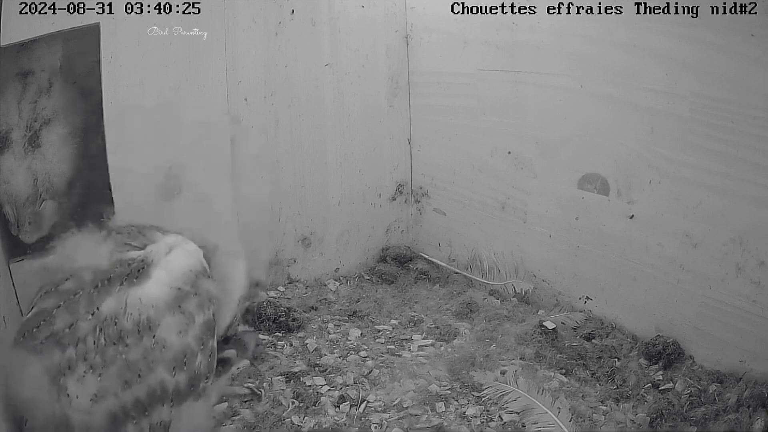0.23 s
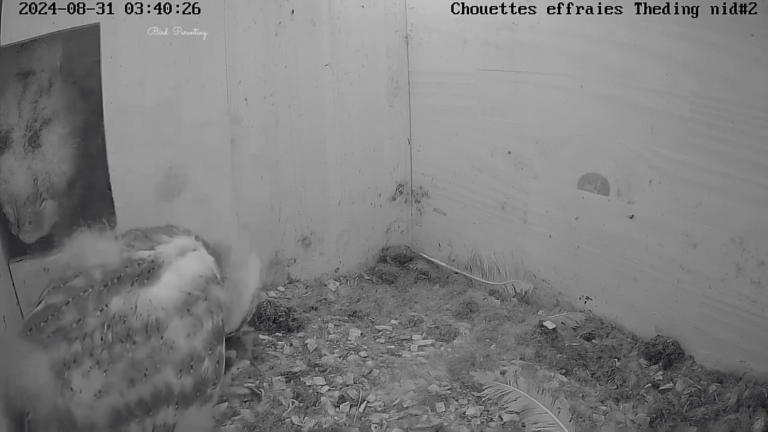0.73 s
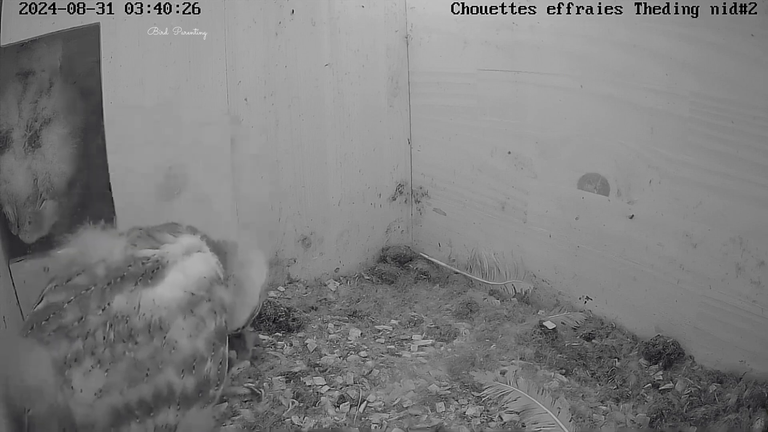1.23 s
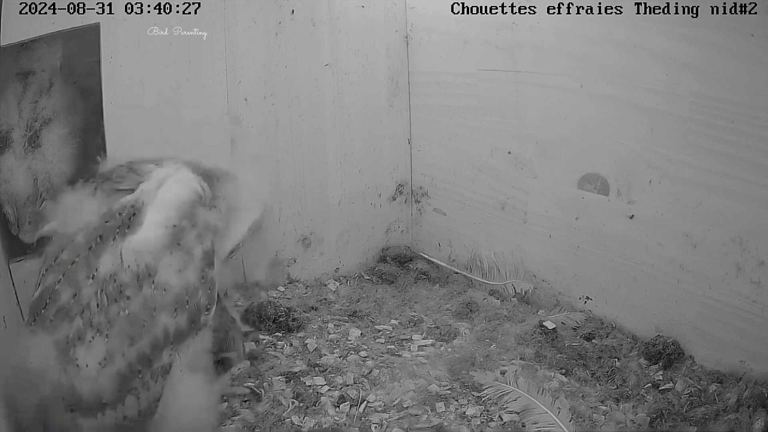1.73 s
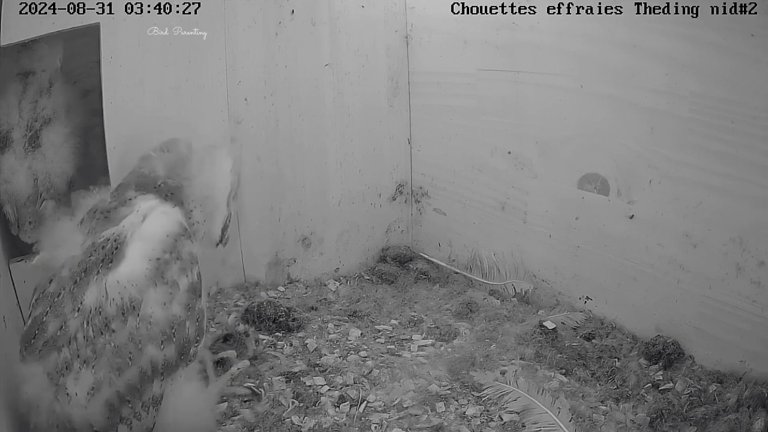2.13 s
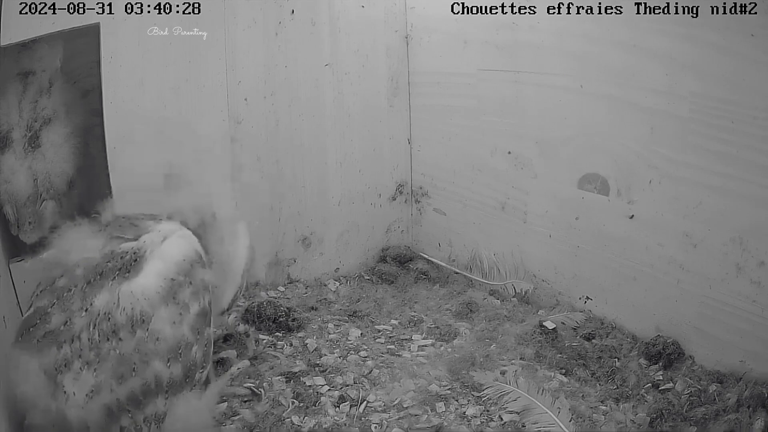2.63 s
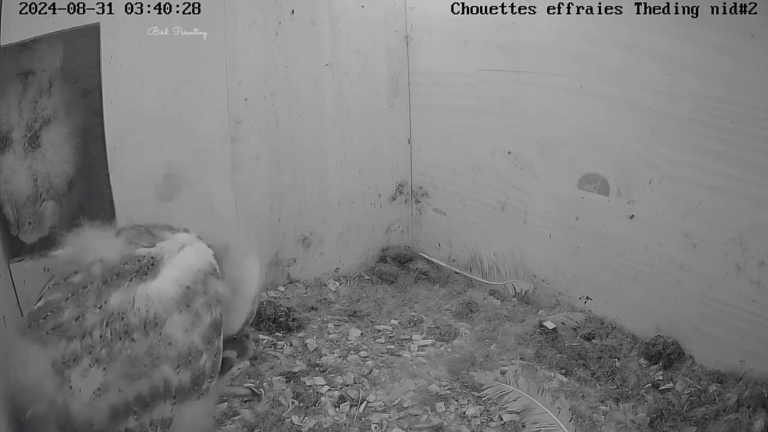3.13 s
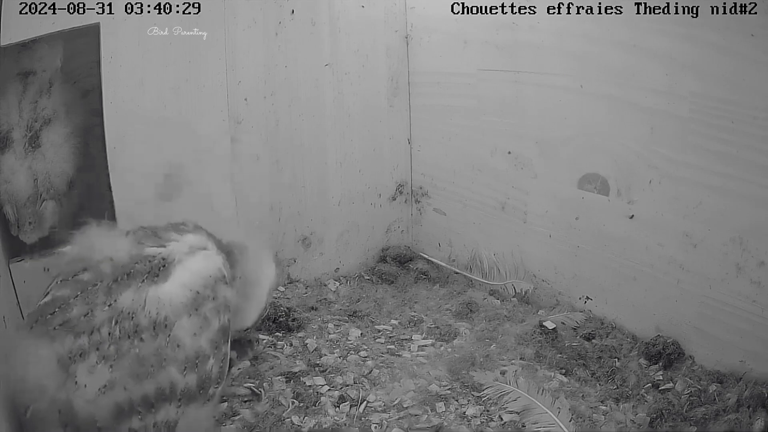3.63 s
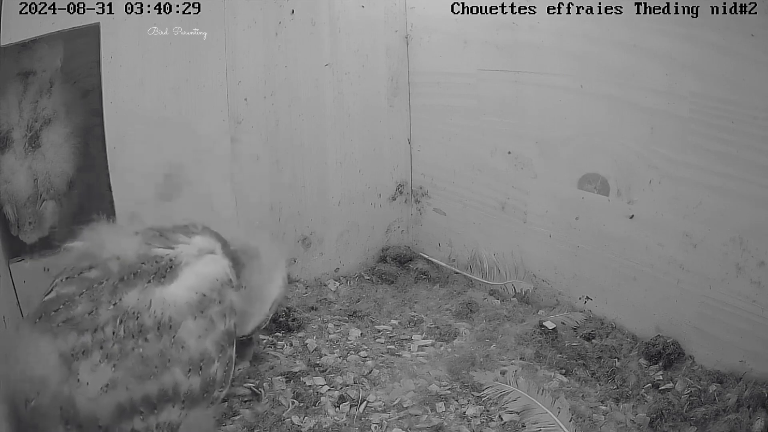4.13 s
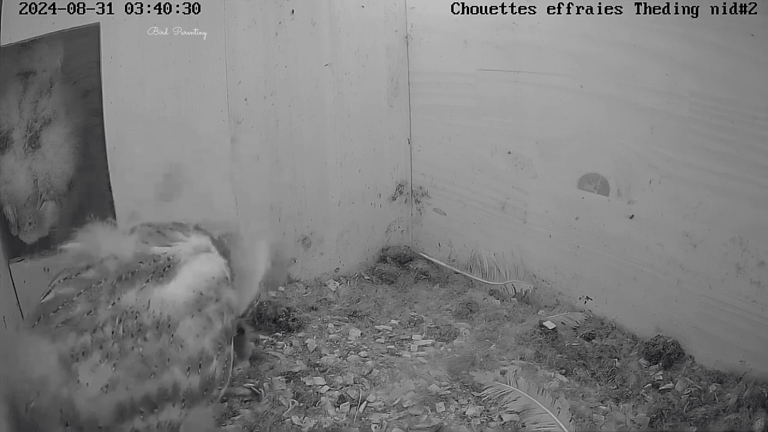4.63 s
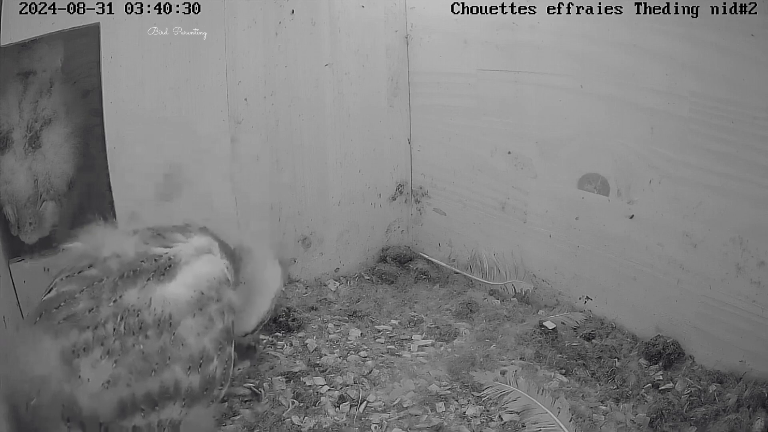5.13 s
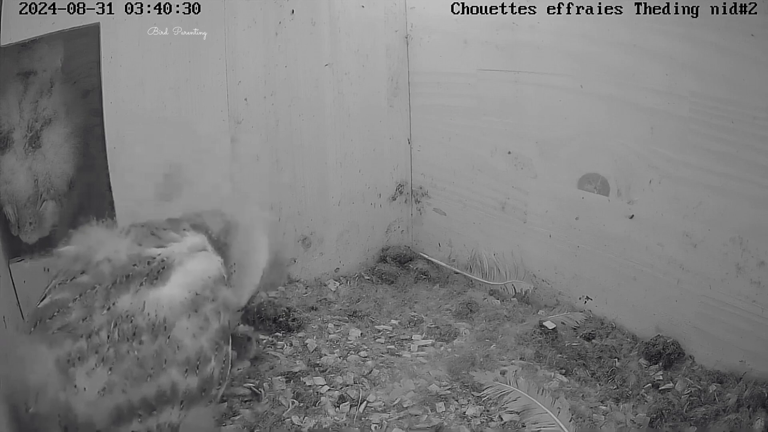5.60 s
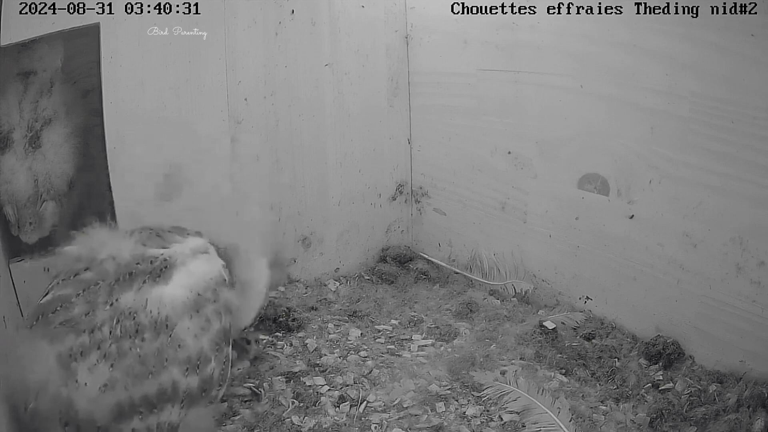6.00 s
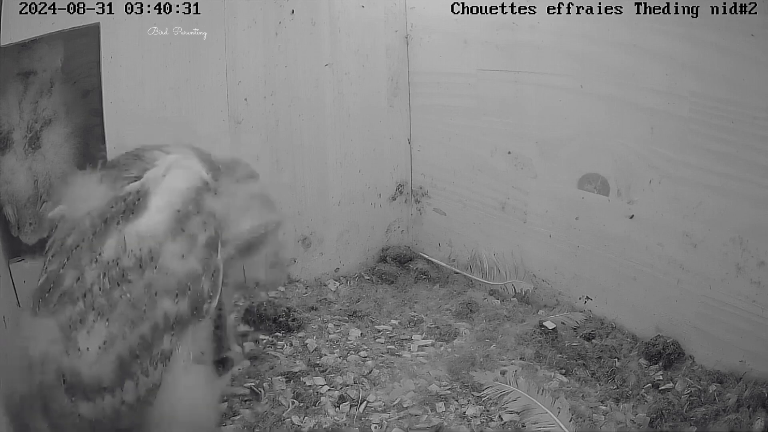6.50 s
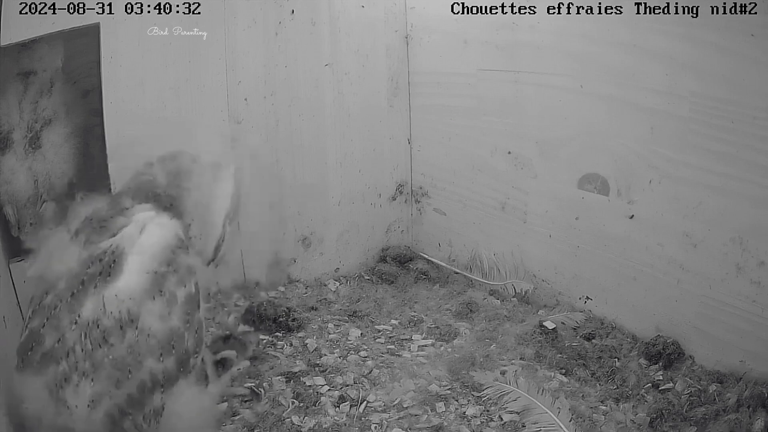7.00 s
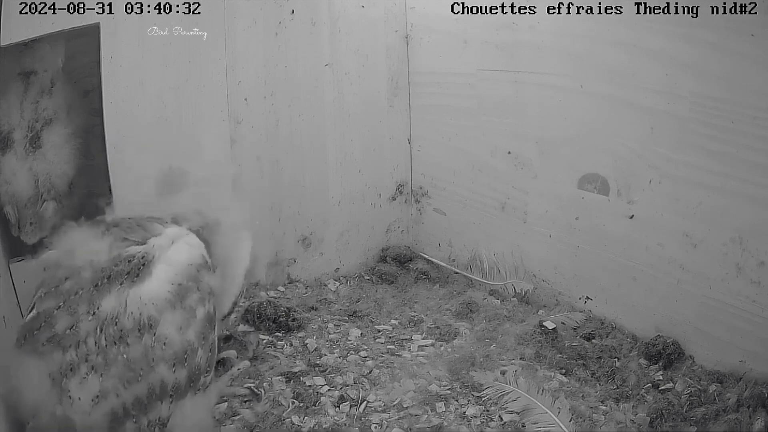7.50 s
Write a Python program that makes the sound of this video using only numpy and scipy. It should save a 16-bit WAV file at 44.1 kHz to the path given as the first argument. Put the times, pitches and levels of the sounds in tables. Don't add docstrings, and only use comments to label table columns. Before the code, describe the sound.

Repeated raspy, breathy screeches from a barn owl chick in a small nest box, soft low knocks between them, over faint hiss with brief stutters.

```python
import sys
import numpy as np
from scipy import signal
from scipy.fft import rfft, irfft
from scipy.io import wavfile
from scipy.ndimage import uniform_filter1d

SR = 44100
rng = np.random.default_rng(int(sys.argv[2]) if len(sys.argv) > 2 else 0)


def attenuation_scalar(level_db):
    decades = np.asarray(level_db, float) / 20
    return 10 ** decades


def pcm_store(signal):
    levels = np.round(np.clip(np.atleast_2d(signal), -1, 1) * 32767)
    wavfile.write(sys.argv[1], SR, levels.astype(np.int16).T)


N = 341775


def evened(x):
    return x / np.sqrt(np.mean(x ** 2) + 1e-20)


def read(points, hz):
    f, value = np.transpose(points)
    return np.interp(np.log(hz + 1), np.log(f + 1), value)


def add(mix, s, sound):
    part = mix[round(s * SR):][:len(sound)]
    part += sound[:len(part)]


def patchy(x, patchy_db, flicker_db):
    z = signal.stft(x, nperseg=512, noverlap=384)[2]
    draws = rng.standard_normal(z.shape[::-1]).T
    patches = uniform_filter1d(draws, size=6, axis=0)
    patches = evened(uniform_filter1d(patches, size=14, axis=1))
    flicker = evened(uniform_filter1d(draws.mean(0), size=3))
    z = z * attenuation_scalar(patchy_db * patches + flicker_db * flicker)
    return signal.istft(z, nperseg=512, noverlap=384)[1][:len(x)]


def beg(mix):
    # (start [s], strongest [s], end [s])
    hisses = [
        (-.4, 0.0, .212),
        (.632, .95, 1.22),
        (1.492, 1.81, 1.993),
        (2.236, 2.85, 2.958),
        (3.433, 3.92, 4.02),
        (4.764, 5.44, 5.532),
        (6.892, 7.47, 7.542),
    ]
    # (peak [dB], depth of the swell [dB])
    efforts = [(-31, 20), (-36.5, 19.5), (-43, 31), (-39, 22.5), (-35, 22.5), (-40, 19), (-35, 22)]
    hiss_of_posture = 0, 1, 2, 3, 4, 5, 5, 6
    drives = [(-18, 2.5, -22, 1, -3), (1, -1.5, -28, 0.5, -2.5), (2.5, -20, 0, -1, -3),
              (-3.5, -4.5, -14, -9, 1.5), (0, -4.5, -19, -4, -6), (0.5, -13, -8, -2, 3),
              (-1.5, 0.5, -6, -11, 7.5), (1.5, -2, -6.5, -6.5, -17)]
    # (pitch [Hz], width [Hz], level [dB])
    windpipes = [
        [(2326, 47, 3), (2940, 190, -0.5), (3300, 200, -7), (3820, 20, -6), (3996, 96, -0.5)],
        [(2490, 49, 2), (3570, 53, -3), (4050, 145, -3.5), (5020, 63, -22.5), (6744, 150, 4)],
        [(2450, 63, 1.5), (2680, 57, -5), (4150, 62, -15), (5620, 34, 0), (7210, 120, -3)],
        [(2700, 45, -4), (3610, 53, -3), (3840, 40, -3.5), (4660, 33, -5), (6450, 51, -30)],
        [(3025, 86, 0.5), (4090, 65, 6), (5830, 57, 0), (6130, 31, -10), (7330, 170, -6.5)],
        [(2660, 37, -1), (3230, 210, -4), (3850, 43, -8.5), (6200, 76, -5), (6920, 62, -16)],
        [(3160, 140, -4.5), (3680, 80, -1.5), (5530, 150, -12), (6300, 53, -19), (6890, 97, -14)],
        [(3040, 680, 1), (4086, 84, 6), (5100, 330, -3.5), (5740, 140, -1), (7100, 67, -0.5)],
    ]
    beds = [(-8, -1, -0.56, -2.5, 4, -10.5, -9.5, -13), (-4, -7.5, -0.36, -5, 0.0, -4, 1, -8.5),
            (-8.0, 1.5, -1.6, -3.5, -1.5, -8.5, -4, -19), (-36, -6.5, -1.1, -3.5, -12, -9.5, -4.5, -7),
            (-23, -6, 0.16, -9, -3.5, -6.5, -3.5, -5.5), (-5, 1.5, -0.72, -0.5, -4.5, -7.5, -1.5, -4.5),
            (-27, -7.5, 1, 0.5, -10, -6, -3, -7), (-21, -2, -2.2, -9, -1, -9, -7, -8.5)]
    # (chest [dB], throat [dB], beak [dB])
    balances = [(-19.5, -8.5, -13), (-14.5, -6.5, -3), (-9.5, -6.5, -5.5), (-15, -9, -10.5),
                (-15, -14, -7.5), (-8, -3, -5), (-14.5, -11, -9), (-16.5, -15.5, -7.5)]
    # (first [Hz], second [Hz], third [Hz])
    notches = [(1860, 3630, 4700), (1830, 4680, 5980), (1600, 4030, 4700), (1810, 4450, 5600),
               (1700, 3870, 5550), (1550, 4350, 6050), (1800, 4180, 5600), (1735, 3930, 5980)]
    head_turn_s = 5.21
    for k, look in enumerate(zip(drives, windpipes, beds, balances, notches)):
        heard = (-1, head_turn_s) if k < 6 else (head_turn_s, N / SR)
        call = hiss_of_posture[k]
        add(mix, *hiss((*hisses[call], *efforts[call]), *look, heard))


def hiss(call, drive_db, windpipe, bed, balance_db, notches, heard):
    # (pitch [Hz], width [Hz])
    box_low = [(400, 31), (595, 17), (890, 25), (1070, 34), (1340, 35.6)]
    # (pitch [Hz], width [Hz], level [dB])
    box_high = [(2310, 40, -11.5), (2480, 60, -8), (2750, 59, -18.5), (3294, 24, -10), (3777, 40, -13),
                (4084, 31, -8), (5730, 84, -9.5), (6520, 40, -6), (6980, 39, -15.5)]
    # (pitch [Hz], level [dB per Hz])
    low_bed = [(250, -34), (340, -9), (620, -7), (710, -20), (820, -16), (1400, -13), (1560, -16),
               (1750, -22.5)]
    bed_hz = [1730, 2104, 3070, 3950, 4200, 5050, 6300, 7500]
    # (low edge [Hz], high edge [Hz])
    band_edges = [1750, 5400], [280, 750], [750, 1750], [5400, 7800]
    swell_share = (1.07, 0.082, 0.34, 0.93)
    fade_share = (1.05, 0.063, 0.083, 1.02)
    attack_s, release_s, gate_db = 0.0059, 0.016, 32
    swell_power, droop_db_per_s = 3.64, 25.5
    close_s, close_power, close_db = 0.067, 1.29, 20.5
    slower_close = 0.17
    notch_width_hz, notch_depth, turn_length_s = 60, 0.7, 0.07

    start, top, end, peak_db, swell_db = call
    t = start + np.arange(SR) / SR
    swell = swell_db * np.clip((top - t) / (top - start), 0, 1) ** swell_power
    closing = np.clip(1 - (end - t) / (close_s + slower_close * (end - top)), 0, 1)
    fade = droop_db_per_s * np.maximum(t - top, 0) + close_db * closing ** close_power
    opening = np.clip(1 - (t - start) / attack_s, 0, 1)
    gate = gate_db * (opening + np.maximum(1 - (end - t) / release_s, 0))

    flutter = uniform_filter1d(rng.standard_normal(SR), size=60)
    flutter = evened(uniform_filter1d(flutter, size=60))
    air = patchy(rng.standard_normal(SR) * attenuation_scalar(0.46 * flutter), patchy_db=1.0, flicker_db=-0.55)
    drift = np.pi / 2 * np.clip((t - start) / (end - start), 0, 1)
    shares = np.cos(drift) ** 2, np.sin(drift) ** 2
    air = sum(part * signal.oaconvolve(air, walls())[:SR] for part in shares)

    hz = np.fft.rfftfreq(SR, 1 / SR)
    driven = [(*mode, db) for mode, db in zip(box_low, drive_db)]
    posture = sorted(driven + box_high + list(map(tuple, windpipe)))
    ringing = 0
    for k, (f, width, db) in enumerate(posture):
        ringing = ringing + (-1) ** k * attenuation_scalar(db) / (1 + 2j * (hz - f) / width)
    broad = attenuation_scalar(read(low_bed + [(f, db - 4) for f, db in zip(bed_hz, bed)], hz))
    coloured = rfft(air) * np.hypot(abs(ringing), broad)
    for f in notches:
        coloured = coloured * (1 - notch_depth / (1 + ((hz - f) / notch_width_hz) ** 2))

    out = 0
    for (lo, hi), db, up, down in zip(band_edges, [0, *balance_db], swell_share, fade_share):
        share = np.clip((hz - lo) / 60 + .5, 0, 1) * np.clip((hi - hz) / 60 + .5, 0, 1)
        band = evened(irfft(coloured * np.sqrt(share), SR))
        out = out + attenuation_scalar(db - up * swell - down * fade) * band
    turned = [np.clip((t - s) / turn_length_s + .5, 0, 1) for s in heard]
    out = out * np.sqrt(turned[0] * (1 - turned[1]))
    keep = t >= 0
    return t[keep][0], (out * attenuation_scalar(peak_db - gate))[keep]


def walls():
    t = np.arange(SR // 10) / SR
    echoes = rng.standard_normal(len(t)) * attenuation_scalar(-60 * t / 0.043) * np.minimum(t / 0.003, 1)
    echoes *= attenuation_scalar(-2) / np.linalg.norm(echoes)
    return np.append(1, echoes[1:])


def knock_boards(mix):
    # (time [s], peak [dB], wall pitch [Hz], time to die by 60 dB [s], rise [s])
    thumps = [(.271, -31, 70, 0.17, 0.018), (.33, -46, 79.1, 0.47, 0.0023),
              (.7565, -32.5, 71.8, 0.13, 0.0054), (1.653, -34.5, 65, 0.045, 0.0038),
              (1.702, -41, 66.2, 0.15, 0.0043), (2.003, -26.5, 71.9, 0.14, 0.0017),
              (2.072, -31.5, 74.6, 0.19, 0.00066), (2.175, -44, 60.5, .05, .003),
              (2.238, -36.5, 76.8, 0.088, 0.0026), (3.557, -51.5, 76.4, 0.12, 0.0045),
              (4.606, -52, 52.7, 0.26, 0.0062), (6.383, -48, 91.6, 0.085, 0.002),
              (6.433, -33.5, 81.7, 0.065, 0.0037), (6.465, -34.5, 81.5, 0.1, 0.0024),
              (6.521, -39, 75.8, 0.19, 0.0032), (6.676, -48.5, 66, 0.21, 0.0043)]
    for s, *blow in thumps:
        add(mix, s, thump(*blow))


def thump(db, hz, t60, rise):
    t = np.arange(SR // 2) / SR
    swing = (1 - np.exp(-t / rise)) * attenuation_scalar(db - 60 * (t / t60) ** 1.78) * np.sin(2 * np.pi * hz * t)
    detune = np.geomspace(.6, 2.6, num=5) * rng.uniform(.9, 1.1, 5)
    phase = rng.random(5)
    boards = np.sin(2 * np.pi * (hz * detune * t[:, None] + phase))
    wobble = (attenuation_scalar(-60 * t[:, None] * detune / 0.94) * boards).sum(1)
    return swing + np.minimum(t / 0.0078, 1) * attenuation_scalar(db - 19.5) * wobble


def ring_air(mix):
    # (time [s], peak [dB], pitch [Hz], time to die by 60 dB [s], glide [share of pitch])
    rings = [(.17, -30.5, 1153, 0.084, -0.11), (.196, -31.5, 1025, 0.031, -0.037),
             (.27, -42, 394, 0.089, -0.011), (.385, -54, 406, 0.086, 0.054),
             (1.176, -33, 1121, 0.11, -0.048), (1.2, -49, 1080, 0.13, -0.026),
             (1.678, -52, 396, 0.11, 0.019), (1.958, -38.5, 403.6, 0.21, -0.06),
             (1.975, -37, 246, 0.14, -0.14), (1.993, -40, 1160, 0.044, 0), (3.567, -34, 377, 0.11, -0.031),
             (3.998, -31.5, 1095, 0.048, -0.074), (5.792, -50.5, 790, 0.047, 0),
             (6.413, -38, 780, 0.057, 0.016), (6.414, -43, 1250, .04, -0.012), (6.414, -43, 1640, .04, 0),
             (6.456, -42, 800, 0.059, 0), (6.457, -45, 1290, .04, 0), (6.897, -39, 616, 0.061, 0.035),
             (7.525, -39, 1116, 0.043, -0.039)]
    for s, *tone in rings:
        add(mix, s, ring(*tone))


def ring(db, hz, t60, glide):
    t = np.arange(SR // 5) / SR
    turns = np.cumsum(hz * (1 + glide * np.minimum(t / 0.0267, 1))) / SR
    return np.minimum(t / 0.0028, 1) * attenuation_scalar(db - 60 * t / t60) * np.sin(2 * np.pi * turns)


def scuff_boards(mix):
    # (time [s], level [dB], length [s], brightness [dB per octave])
    scuffs = [
        (6.312, -53, 0.017, 2.5),
        (6.392, -55.5, 0.01, 3),
        (6.404, -44.5, 0.015, -3.5),
        (6.412, -42, 0.015, -0.5),
        (6.436, -50, 0.015, 0.5),
        (6.454, -48.5, 0.013, -1.5),
    ]
    for s, *stroke in scuffs:
        add(mix, s, scuff(*stroke))


def scuff(db, length, bright_db):
    # (pitch [Hz], level [dB per Hz])
    wood = [(180, -16), (300, -18), (482, -18), (827, -6.5), (1650, -13), (1970, -21), (2950, -22),
            (3520, -26), (5070, -21.5), (7600, -19.5), (9880, -46), (16700, -120)]
    hz, t = np.fft.rfftfreq(4096, 1 / SR), np.arange(4096) / SR
    grit = rng.standard_normal(4096) * attenuation_scalar(0.94 * rng.standard_normal(4096))
    colour = attenuation_scalar(read(wood, hz) + bright_db * np.log2(hz / 1500 + .01))
    drag = evened(irfft(rfft(grit) * colour))
    return attenuation_scalar(db) * drag * np.minimum(t / 0.0046, 1) * np.exp(-np.maximum(t - length, 0) / 0.0022)


def floor():
    # (pitch [Hz], level [dB per Hz])
    night = [(12, -49), (20, -11.5), (70, -4), (256, -9.5), (327, -13.5), (361, -9), (716, -15),
             (1030, -16), (1200, -17.5), (1320, -18.5), (7000, -26.5), (9100, -57), (15400, -120)]
    colour = attenuation_scalar(read(night, np.fft.rfftfreq(N, 1 / SR)))
    noise = irfft(rfft(rng.standard_normal(N)) * colour, N)
    return attenuation_scalar(-59) * evened(patchy(noise, patchy_db=1.5, flicker_db=-0.5))


def scene():
    mix = floor()
    beg(mix)
    knock_boards(mix)
    ring_air(mix)
    scuff_boards(mix)
    return mix[None]


def camera_band(x, top_hz):
    hz = np.fft.rfftfreq(N + SR, 1 / SR)
    return irfft(rfft(x, N + SR) * np.clip((top_hz - hz) / 350, 0, 1) ** 2, N + SR)[:N]


def link(x):
    places = -4.22, -2.46, .32, 3.06, 5.78
    packet_s, cycle_packets, clock_start_s = .0261455, 12.7825, .03367
    stall_s, skip_s, ahead_s = .00791, .00581, .003
    cycles = np.arange(int(N / SR / packet_s / cycle_packets) + 1)[:, None]
    packet = np.floor(cycle_packets * cycles + places)
    slip = np.tile([-skip_s] + 4 * [stall_s], (len(cycles), 1))
    slipped = (np.cumsum(slip) - slip.ravel()).reshape(slip.shape)
    times = clock_start_s + packet_s * packet + slipped
    ahead, on = np.zeros(N, int), np.ones(N)
    for skip, *stalls in np.round(np.maximum(times, -stall_s) * SR).astype(int):
        ahead[max(skip, 0):max(stalls[0], 0)] = round(ahead_s * SR)
        for s in stalls:
            on[max(s, 0):max(s + round(stall_s * SR), 0)] = 0
    return on * x[np.minimum(np.arange(N) + ahead, N - 1)]


def thrifty_stage(x, thrift_db, grain_db):
    # (pitch [Hz], quiet limit [dB], limit below the loud bands [dB])
    hearing = [(3000, -125, 45), (5100, -106, 40), (6700, -96.5, 40), (7700, -99.5, 29), (9000, -104, 23),
               (10300, -112, 56), (15000, -112, 41)]
    hz, _, z = signal.stft(x, SR, nperseg=2048, noverlap=1024, window="cosine")
    power = abs(z) ** 2 + 1e-16
    band = (hz // 330).astype(int)
    chance = rng.standard_normal((z.shape[1], band[-1] + 2)).T
    f, quiet_db, under_db = np.transpose(hearing)
    loud_db = 10 * np.log10(power[40:300].mean(0))
    limit_db = np.maximum(np.interp(hz, f, quiet_db)[:, None],
                          loud_db - np.interp(hz, f, under_db)[:, None])
    limit_db += thrift_db * (np.clip(chance[-1], -1.8, 1.3) + 0.7 * chance[band])
    level_db = 10 * np.log10(uniform_filter1d(power, size=5, axis=0))
    keep = 1 / (1 + np.exp(np.clip(3 * (limit_db - level_db), -50, 50)))
    error = attenuation_scalar(level_db + grain_db) * np.exp(2j * np.pi * rng.random(z.shape[::-1]).T)
    z = (z + error) * keep
    return signal.istft(z, SR, nperseg=2048, noverlap=1024, window="cosine")[1][:N]


def roll_off(x):
    return signal.sosfilt(signal.butter(12, 15850, fs=SR, output="sos"), x)


def record(dry):
    sent = link(camera_band(dry[0], top_hz=7732))
    thinned = thrifty_stage(sent, thrift_db=9.0, grain_db=-18.5)
    return roll_off(thinned[None])


dry = scene()
out = record(dry)
pcm_store(out)
```